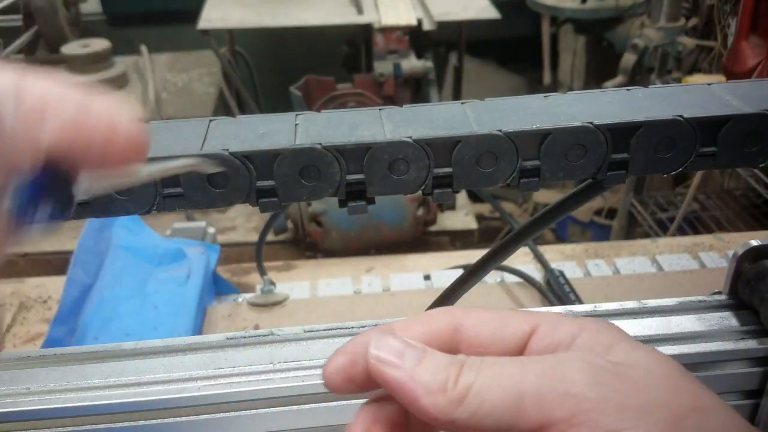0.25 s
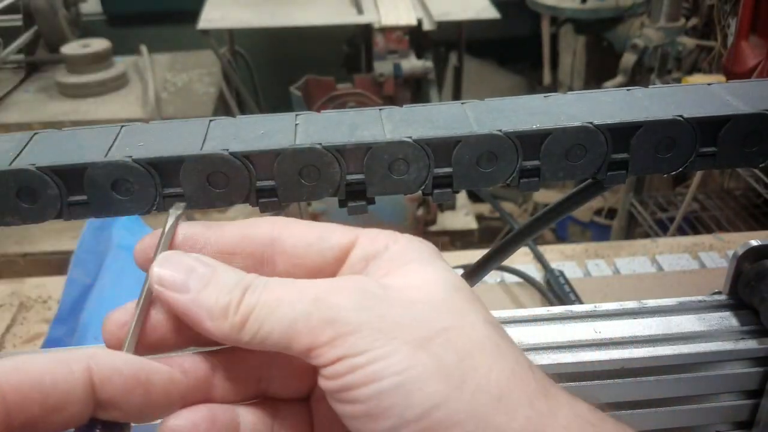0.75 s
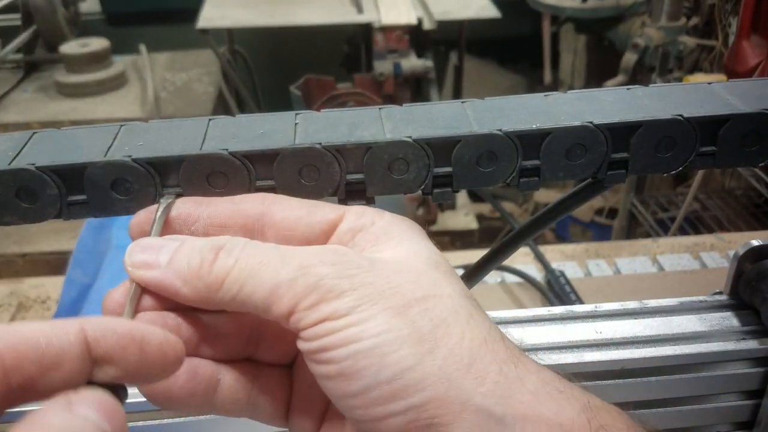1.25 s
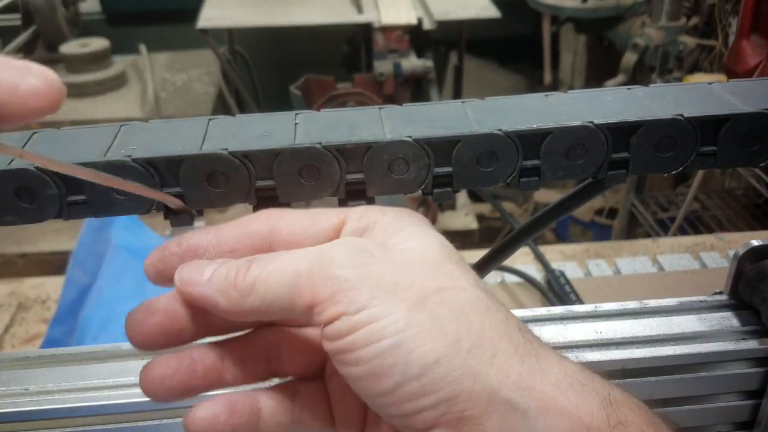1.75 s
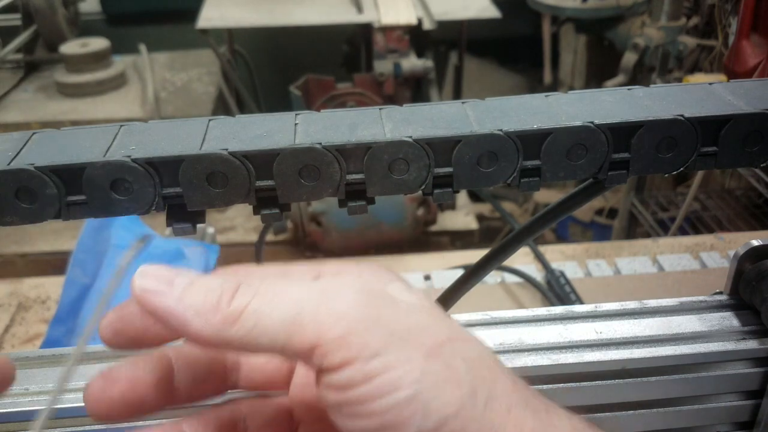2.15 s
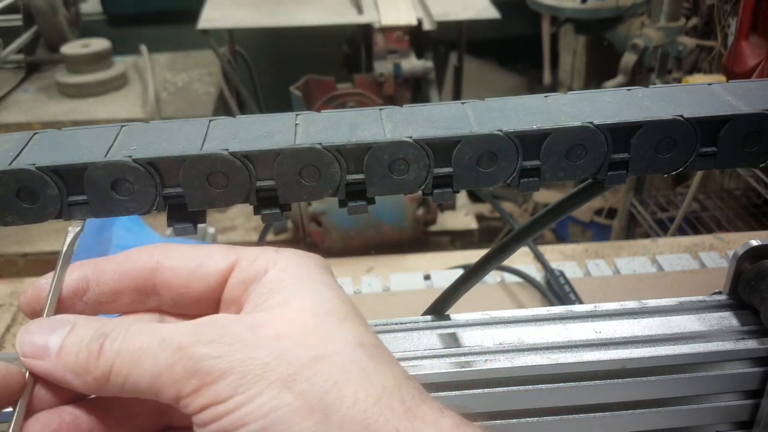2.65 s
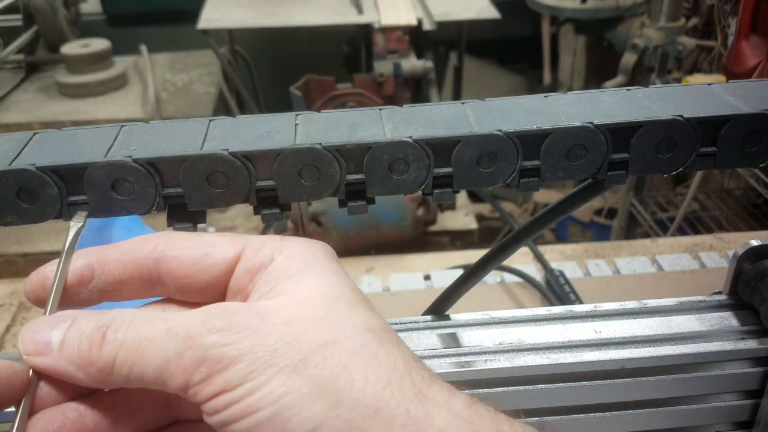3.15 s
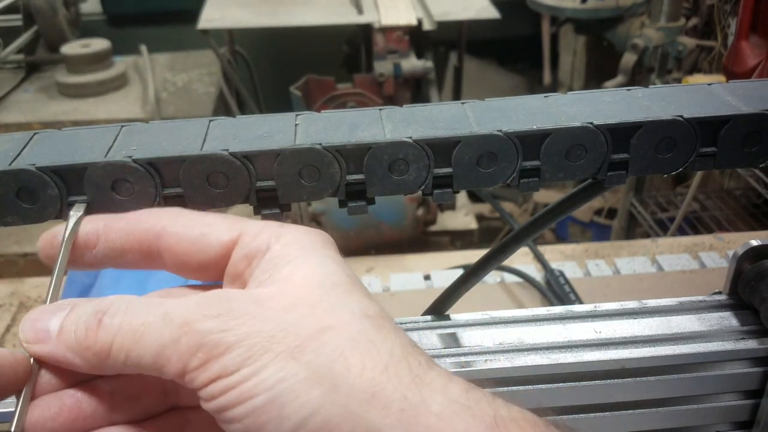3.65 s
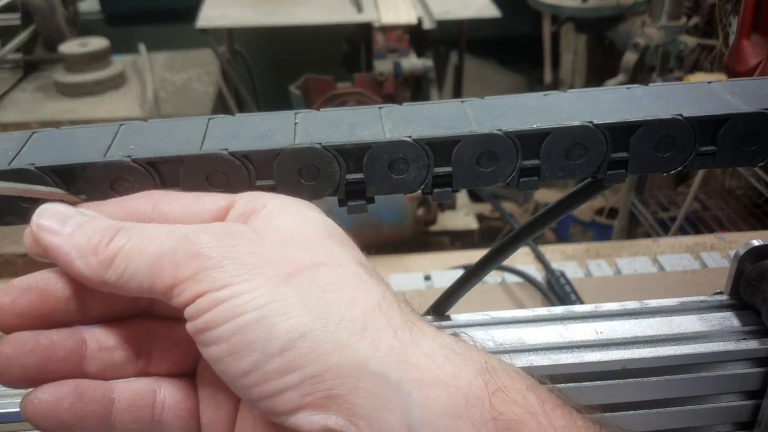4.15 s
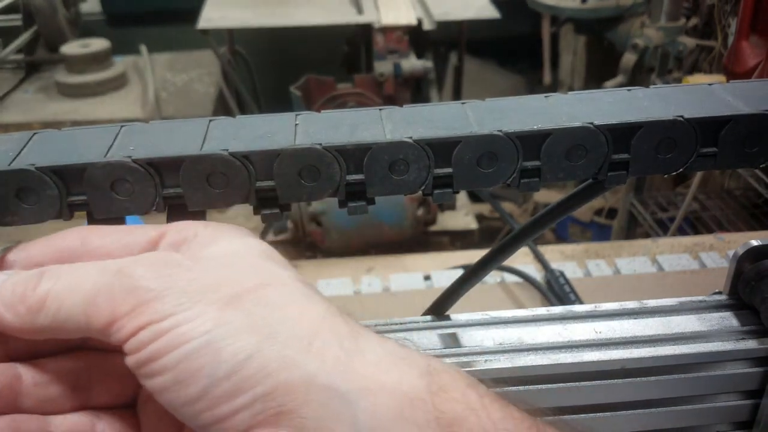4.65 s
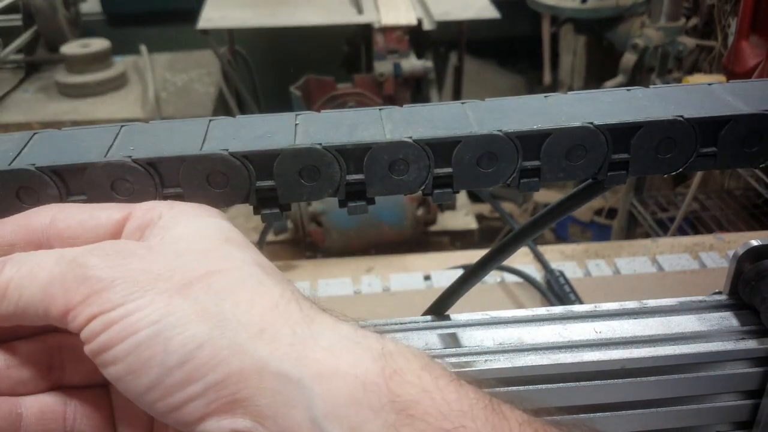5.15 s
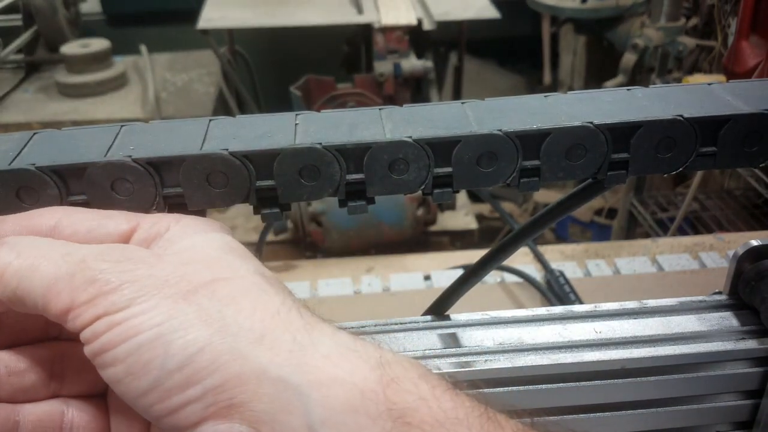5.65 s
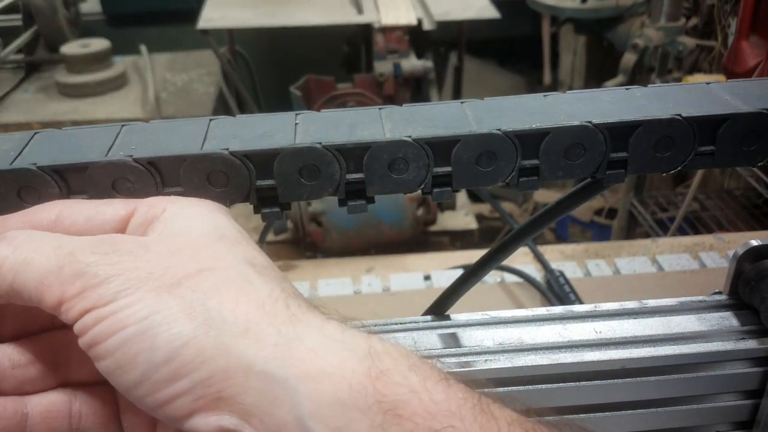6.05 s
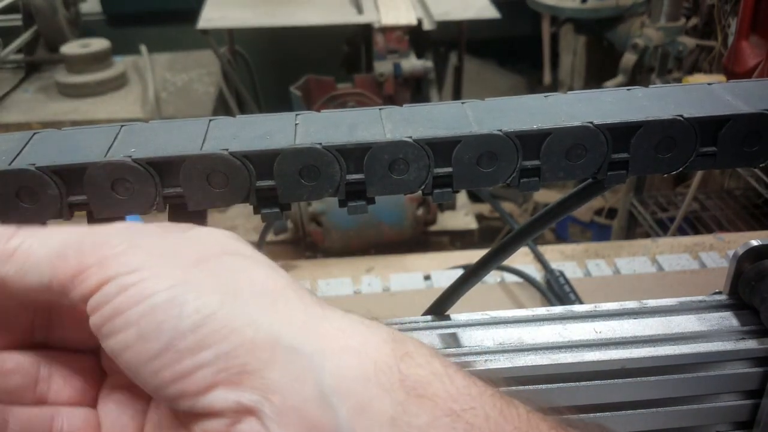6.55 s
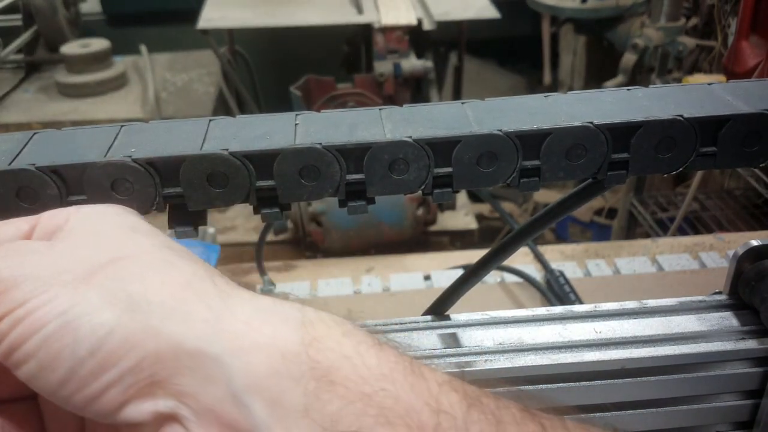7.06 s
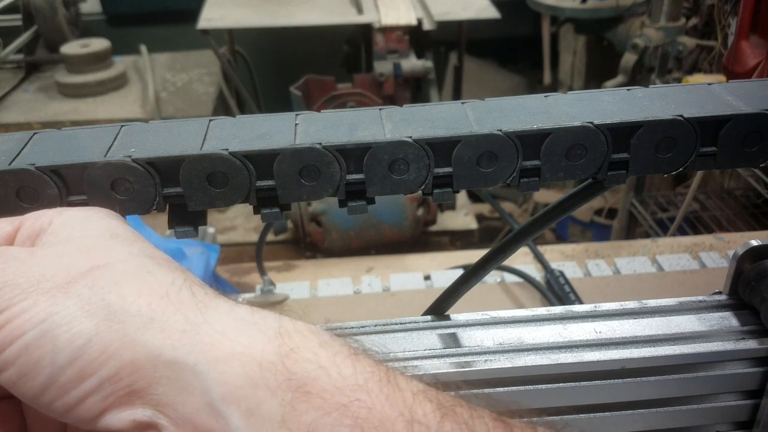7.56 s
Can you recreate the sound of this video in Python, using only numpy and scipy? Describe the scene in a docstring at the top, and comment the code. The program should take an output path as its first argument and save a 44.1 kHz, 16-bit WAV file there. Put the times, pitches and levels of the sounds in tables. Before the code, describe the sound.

Close stereo pickup of a small screwdriver prying crossbars off a plastic cable chain. Faint ticks, then a loud dry snap with a short rattle at about 1.5 seconds, another at 4 and the hardest just after 6. Brief scrapes and creaks follow each one. The workshop returns a short reflection, and a fan hums quietly throughout.

```python
"""Sharp plastic ticks come first: a small screwdriver pries at a cable chain, close to a stereo microphone.
Three crossbars snap free in a workshop; each blow is a dense crack, a rattle and the ringing modes of the links.
Scrapes and chatter, made of tiny friction slips, are heard as blade and hinges rub.
Bench and walls throw these sounds back; behind them a fan hums: coloured noise with wavering tones."""
import sys
import numpy as np
from scipy import signal
from scipy.fft import rfft, irfft
from scipy.io import wavfile
from scipy.ndimage import uniform_filter1d

SR = 44100
rng = np.random.default_rng(int(sys.argv[2]) if len(sys.argv) > 2 else 0)


def master_out(mix):
    """Clip the mix to full scale and print it as 16-bit PCM to the path in sys.argv[1]."""
    frames = np.transpose(np.atleast_2d(mix))
    ceiling = np.clip(frames, -1, 1)
    pcm = np.round(ceiling * 32767).astype(np.int16)
    wavfile.write(sys.argv[1], SR, pcm)


N = 343530  # samples

# Ticks of the blade and snaps of the bars, levels before room and stereo balance:
# t/s, level/dB, treble/dB, thud/dB, struck spot f/Hz, crack decay/s, lift of rattle and modes/dB
BLOWS = [ (0.0654, -40, 7, 5, 4470, 0.0019, 6), (0.115, -36, 7, -9, 3300, 0.00091, 5),
         (0.1433, -33, 7, -20, 1970, 0.00067, 6), (0.4734, -38.5, -3, 0.5, 2470, 0.0053, 2.5),
         (1.244, -37, -5, 7.5, 3770, 0.0021, 7.5), (1.3767, -50, 13, 13, 3000, .002, -2),
         (1.406, -45, 14, 20, 910, .0018, 2), (1.4407, -31.5, -0.5, -2, 900, 0.00082, -4),
         (1.4621, -12, 4, -6, 1480, 0.0024, 1), (1.5804, -24, 4.5, -4, 1000, 0.00086, 1.5),
         (1.674, -34, -5, 13, 2730, 0.0015, 7), (1.806, -29, -16, -7, 3380, .0022, 6),
         (2.546, -43.5, -1, 4, 1110, .003, 21), (3.0618, -49, 25, -7, 3960, 0.0017, 7),
         (3.189, -57, 20, -2, 4500, .0025, 8), (3.8541, -39.5, -7, 10.5, 3130, 0.0027, 0),
         (3.9816, -27.5, 0, 5, 1600, 0.003, 2), (4.0026, -13, 0.5, -9, 700, 0.0017, 4),
         (4.0844, -35.5, -14, -6, 960, 0.0017, 3), (4.192, -39, 16, 14, 900, .003, 17),
         (4.677, -44, -33, 14, 990, 0.0012, 0), (5.012, -45.5, 15.5, 19.5, 4530, .0019, 20),
         (5.4854, -49.5, -5, -13, 4430, 0.0007, -4), (5.5499, -40.5, 19, 2, 5740, 0.001, -5),
         (5.6338, -39.5, 6, 5, 910, 0.0024, 15), (5.654, -42.5, -8, 11, 1450, .0028, 17),
         (5.889, -32, -2.5, 10.5, 880, 0.0017, 23), (6.2179, -9.5, 6, -6.5, 1790, .0012, 4.5),
         (6.2574, -26.5, -6, -8, 990, 0.0014, -6), (6.355, -33.5, 18, 9.5, 5130, .003, 22),
         (6.383, -29, 5, -7, 4700, .0037, 23), (7.038, -50, -1, 4, 2300, .0021, -2), ]
# Colour of the struck plastic: f/Hz, relative level/dB
STRUCK_COLOUR = [(40, -16), (110, -7.5), (200, -3), (480, -0.5), (750, 6.5), (1050, 6), (1700, 2),
                 (2800, 2), (4600, 2), (6300, -9.5), (8500, -7), (11500, -8), (13000, -13), (16000, -14.5)]
# A light tap sounds mostly the spot it lands on, a hard snap the whole link
SNAP_DB, SNAP_SPOT_DB = -11.5, 6.5  # a full snap: its level, and how far its spot stands out
SPOT_SHARE = 0.12  # dB more of the spot for each dB that a blow is weaker


def clicks(spot_octaves=0.29, thud_hz=900, onset_size=180):
    """Ticks of the blade and snaps of the bars, each coloured by the spot that is struck."""
    out = np.zeros((2, N))
    hz = bins(2048) + 1
    for s, db, treble_db, thud_db, spot_hz, crack_s, ring_db in BLOWS:
        spot_db = SNAP_SPOT_DB + SPOT_SHARE * (SNAP_DB - db)
        octaves_off = np.log2(hz / spot_hz)
        colour = read(STRUCK_COLOUR, hz) + treble_db * treble(hz)
        colour += thud_db / (1 + (hz / thud_hz) ** 2)
        colour += spot_db * np.exp(-(octaves_off / spot_octaves) ** 2)
        blow = coloured(link_response(s, crack_s, ring_db), colour)
        onset_level = blow[:, :onset_size].std()  # over the first samples
        add(out, s, in_workshop(amp(db) * blow / onset_level))
    return out


def link_response(s, crack_s, ring_db, rattle_db=-11, rattle_s=0.0083, modes_db=-29, grain_db=3, size=8192):
    """A blow on a link: a dense crack, a short uneven rattle along the chain, and the links' modes."""
    t = np.arange(size) / SR
    crack = rng.choice([-1., 1.], size) * np.exp(-t / crack_s)
    # a sudden release excites all bands alike: level out the crack's smoothed spectrum
    power = uniform_filter1d(abs(rfft(crack, 2048)) ** 2, size=24)
    crack = coloured(crack[None], -10 * np.log10(power / power.mean()))[0]
    knocks = amp(grain_db * evened(uniform_filter1d(rng.standard_normal(size), size=90)))
    rattle = evened(irfft(diffuse(size)) * knocks) * np.exp(-t / rattle_s)
    ringing = amp(rattle_db) * rattle + amp(modes_db) * link_ring()
    return from_left(crack, s) + amp(ring_db) * ringing


# Modes of the chain links: f/Hz, relative level/dB, t60/s
LINK_MODES = [(201, -1.5, 0.075), (344, -2.5, 0.17), (590, -11, 0.36), (740, -7, 0.097), (1241, 3, 0.03),
              (1510, 3.5, 0.022), (1652, 7.5, 0.032), (1790, 5.5, 0.024), (2032, 2.5, 0.067),
              (2330, 9.5, 0.033), (2674, 3.5, 0.042), (2830, 1, .1), (3010, 2, 0.072), (3466, 2, 0.048),
              (3770, -14, 0.025), (4363, -4.5, 0.084), (4760, -19, 0.017), (4930, -24, 0.23),
              (5970, 8, 0.03), (8300, -26, 0.031), (10250, 1, 0.022)]


def link_ring(size=8192):
    """The modes of the links; each radiates to the two microphone ports with its own phase."""
    t = np.arange(size) / SR
    turns = rng.random((len(LINK_MODES), 2, 1))
    turns[:2, 1] = turns[:2, 0]  # the longest waves meet both ports alike
    ring = np.zeros((2, size))
    for (hz, db, t60), turn in zip(LINK_MODES, turns):
        ring += amp(db - 60 * t / t60) * np.sin(2 * np.pi * (hz * t + turn))
    return ring


# Rubs of blade or hinge, relative levels: t/s, push/s, release/s, level at the end of the push/dB,
# swell during the push/dB, treble/dB (-8 is neutral), slip rate f/Hz, chatter weight (0-1)
RUB_STROKES = [ (0.113, 0.031, 0.018, -48, -4.5, -3, 900, 0), (1.571, 0.0096, 0.0053, -24, 22, 1, 900, 0),
               (1.678, 0.075, 0.021, -29, 15, -7, 1050, 0.24),
               (1.813, 0.017, 0.011, -34.5, 4.5, -4, 900, 0.35),
               (4.190, 0.032, 0.022, -32, 6, -7.5, 620, 0), (4.311, .014, 0.019, -42, 9, -3, 900, 0.06),
               (5.640, 0.012, 0.096, -51, 3, -24, 900, 0), (5.860, .029, .020, -49.5, 6, -1.5, 900, 0.3),
               (6.349, 0.038, .023, -27.5, 14.5, -5, 880, 0.22),
               (6.397, 0.011, 0.042, -24, 18, -6.5, 890, 0.5), ]
# Colour of the rubbed plastic: f/Hz, relative level/dB
RUBBED_COLOUR = [(60, -19), (200, -11.5), (500, -7), (900, 4.5), (1300, 1), (1750, 0), (2600, 1.5),
                 (4700, -7.5), (6500, -17), (7800, -16), (9200, -5.5), (12000, -17.5), (16000, -18.5)]
RUB_ATTACK_S, SWELL_CURVE = .001, 2.2  # the contact takes hold at once, then the pressure builds ever faster
RELEASE_DB = 20  # the fall during one release time
BRIGHTEN_SHARE = .3  # a lighter contact hisses more: dB of treble for each dB below the peak
CHATTER_FADE_DB = 15  # this far below the peak a third of the chatter share is left


def rubs(gain_db=-1, usual_treble_db=-8, grain_db=4, grains_per_s=2800, jitter=0.024, ring_db=-11, lightest_db=18):
    """Friction: a hail of tiny slips, which fall into step when the hinge chatters and set the links ringing."""
    out = np.zeros((2, N))
    hz = bins(2048)
    for s, push_s, release_s, peak_db, swell_db, peak_treble_db, slip_hz, chatter in RUB_STROKES:
        t, pressure_db = pressure(push_s, release_s, swell_db)
        size = len(t)
        slack_db = np.clip(-pressure_db, 0, lightest_db)
        treble_db = peak_treble_db + BRIGHTEN_SHARE * slack_db
        share = np.clip(chatter * (1.5 - (slack_db / CHATTER_FADE_DB) ** 2), 0, 1)
        # irregular slips, of random size and sign
        sizes = amp(grain_db * np.minimum(rng.exponential(1, size), 3)) * rng.choice([-1, 1], size)
        grains = sizes * (rng.random(size) < grains_per_s / SR)
        # slips in step, at a slightly unsteady rate
        wobble = evened(uniform_filter1d(rng.standard_normal(size), size=60))
        cycles = np.cumsum(slip_hz * (1 + jitter * wobble)) / SR
        slips = np.diff(np.floor(cycles), prepend=0)
        drive = np.sqrt(1 - share) * evened(grains) + np.sqrt(share) * evened(slips - slips.mean())
        body = evened(coloured(from_left(drive), read(RUBBED_COLOUR, hz)))
        top = irfft(rfft(body) * treble(bins(size)), size)
        brightened = body + (amp(treble_db - usual_treble_db) - 1) * top
        rub = amp(peak_db + pressure_db + gain_db) * brightened
        rub *= np.minimum(t / RUB_ATTACK_S, 1)
        ring = link_ring()
        ring *= amp(ring_db) / np.linalg.norm(ring[0])
        ring[:, 0] = 1  # the slips themselves
        add(out, s, in_workshop(signal.fftconvolve(rub, ring, axes=1)))
    return out


def pressure(push_s, release_s, swell_db, size=8192):
    """Times and contact pressure, in dB relative to the end of the push: it swells, then lets go."""
    t = np.arange(size) / SR
    building = 1 - np.minimum(t / push_s, 1) ** SWELL_CURVE
    return t, -swell_db * building - RELEASE_DB * np.maximum(t - push_s, 0) / release_s


# The blade works leftwards along the chain: t/s, lag of the right port/s
RIGHT_LAG = [(1.5, 0.00017), (4.0, .00022), (6.2, .00027)]


def from_left(x, s=0):
    """Sound from the left at time s: it reaches the right port a little later."""
    at = np.arange(len(x))
    lag = round(np.interp(s, *np.transpose(RIGHT_LAG)) * SR)
    return np.array([x, np.interp(at - lag, at, x, left=0)])


# The workshop's decay: f/Hz, t60/s
ROOM_DECAY = [(150, 0.26), (700, 0.24), (3000, 0.25), (15000, 0.29)]
# Colour of its reflections: f/Hz, level/dB
ROOM_COLOUR = [(100, -12), (200, 14), (600, -8), (2500, -11.5), (7000, -13.5), (15000, -22)]


def in_workshop(x, first_s=0.0084, build_s=0.0006, size=16384):
    """A sound with decaying diffuse reflections from bench and walls, drawn anew for every sound."""
    hz, t, z = signal.stft(irfft(diffuse(size)), SR, nperseg=256)
    t60 = read(ROOM_DECAY, hz)[:, None]
    z = z * amp(read(ROOM_COLOUR, hz)[:, None] - 60 * t / t60)
    z *= np.sqrt(np.log(1e6) / (t60 * SR))  # equal energy whatever the decay time
    response = signal.istft(z, SR, nperseg=256)[1]
    since_first = np.maximum(np.arange(response.shape[1]) / SR - first_s, 0)
    response *= 1 - np.exp(-since_first / build_s)
    response[:, 0] = 1  # the direct path
    return signal.fftconvolve(x, response, axes=1)


# The fan's rush of air and the steady hiss above it: f/Hz, relative level/dB
AIR_COLOUR = [(20, -18.5), (120, -21), (260, -19.5), (330, -7), (430, -7), (530, -11.5), (760, -20.5),
              (1200, -20.5), (2000, -21), (4000, -28.5), (6500, -36.5), (10500, -32), (13000, -31),
              (16000, -25)]
# Resonances of the fan housing and the hiss: f/Hz, width/Hz, boost/dB
HOUSING_MODES = [(404, 36, 5), (429, 20.2, 10), (472.6, 13.4, 9), (585, 47, 9), (859, 83, 9.5),
                 (1014, 61, 9), (1327, 100, 5), (1535, 60, 9), (4140, 13.5, 15), (12760, 610, 10)]
# Fan tones, before the stereo balance: f/Hz, level/dB, left-right/dB
FAN_TONES = [(112.5, -82.5, 7), (190, -82, 3), (685.7, -67.5, -15), (906, -68.5, 11.5), (1372, -75.5, 8)]


def fan(air_db=-48.0, waver_hz=1.387):
    """Air rushing through a resonant housing, with a few wavering tones."""
    hz = bins(N)
    colour = read(AIR_COLOUR, hz)
    for f, width, db in HOUSING_MODES:
        colour = colour + db / (1 + (2 * (hz - f) / width) ** 2)
    out = amp(air_db) * evened(irfft(diffuse(N) * amp(colour), N))
    for f, db, side_db in FAN_TONES:
        drift = evened(uniform_filter1d(rng.standard_normal(N), size=6000))
        tone = evened(np.sin(2 * np.pi * np.cumsum(f + waver_hz * drift) / SR))
        out += amp([[db + side_db / 2], [db - side_db / 2]]) * tone
    return out


# Likeness of the two ports for sound from all around: f/Hz, correlation (-1..1)
PORT_LIKENESS = [(30, 1), (70, 0.2), (150, 0.68), (300, 0.81), (600, 0.88), (1000, -0.14), (1400, -0.33),
                 (3000, -0.05), (7000, -0.03)]


def diffuse(size):
    """Spectra of noise from all around: alike at both ports in the bass, nearly unrelated in the treble."""
    a, b = rfft(rng.standard_normal((2, size)))
    same = np.clip(read(PORT_LIKENESS, bins(size)), -1, 1)
    return np.array([a, same * a + np.sqrt(1 - same ** 2) * b])


def treble(hz, corner_hz=5600):
    """A shelf from 0 below the corner to 1 above it."""
    return 1 - 1 / (1 + (hz / corner_hz) ** 6)


def coloured(x, db):
    """Causal minimum-phase filter with the given gain at evenly spaced frequencies."""
    log_gain = np.log(amp(np.r_[db, db[-2:0:-1]]))
    taps = irfft(np.exp(np.conj(signal.hilbert(log_gain)))[:len(db)])
    return signal.fftconvolve(x, taps[None], axes=1)[:, :x.shape[1]]


def amp(db):
    """Decibels to amplitude."""
    return 10 ** (np.asarray(db) / 20)


def evened(x):
    """Scale to an rms of 1."""
    return x / np.sqrt(np.mean(x ** 2) + 1e-20)


def read(points, hz):
    """Read a frequency table along a logarithmic axis."""
    f, value = np.transpose(points)
    return np.interp(np.log(hz + 1), np.log(f + 1), value)


def bins(size):
    """Frequencies in Hz of a real spectrum."""
    return np.fft.rfftfreq(size, 1 / SR)


def add(mix, s, sound):
    """Lay a sound into the mix from time s, cut off at the end of the mix."""
    part = mix[:, max(round(s * SR), 0):][:, :sound.shape[1]]
    part += sound[:, :part.shape[1]]


def scene():
    """The chain up close and the fan behind it."""
    return clicks() + rubs() + fan()


# Stereo balance of the microphone: f/Hz, left-right/dB
PORT_BALANCE = [(60, 1), (400, 3), (2400, 2.3), (6000, 2), (9000, 5.5), (15000, 3.5)]
EDGE_HZ = 15900  # upper band limit


def record(dry):
    """The left port is a little louder; strong peaks are rounded off by overload; then the band limit."""
    tilt = read(PORT_BALANCE, bins(N)) / 2
    heard = irfft(rfft(dry) * amp([tilt, -tilt]), N)
    heard = heard / (1 + (heard / .82) ** 4) ** .25  # never beyond 0.82
    low_pass = signal.firwin(511, EDGE_HZ, window=("kaiser", 9), fs=SR)
    return signal.oaconvolve(heard, low_pass[None], "same")


dry = scene()
out = record(dry)
master_out(out)
```